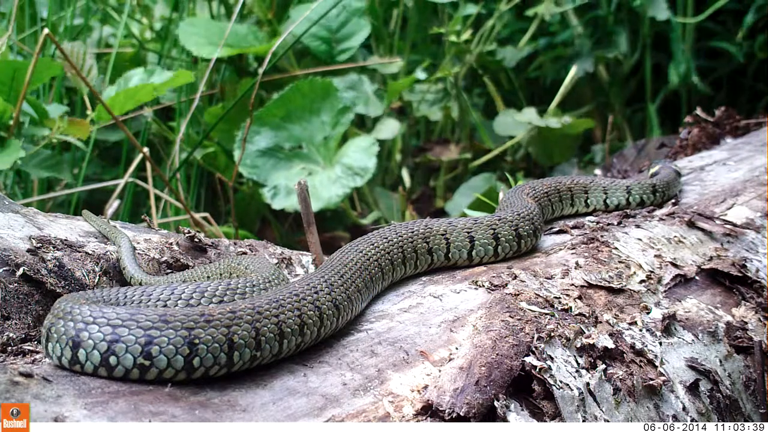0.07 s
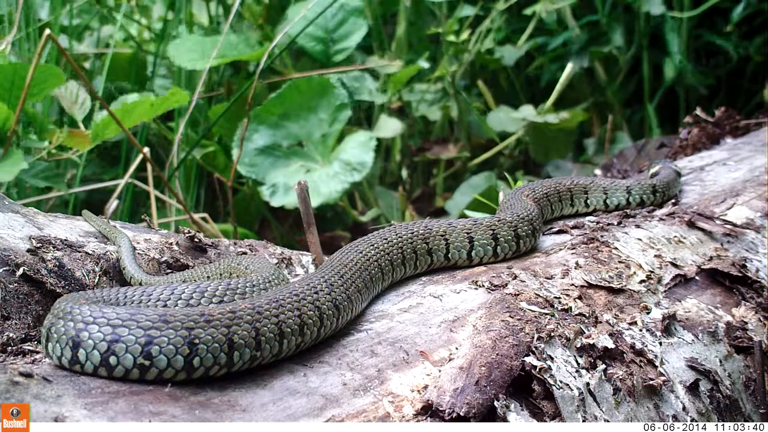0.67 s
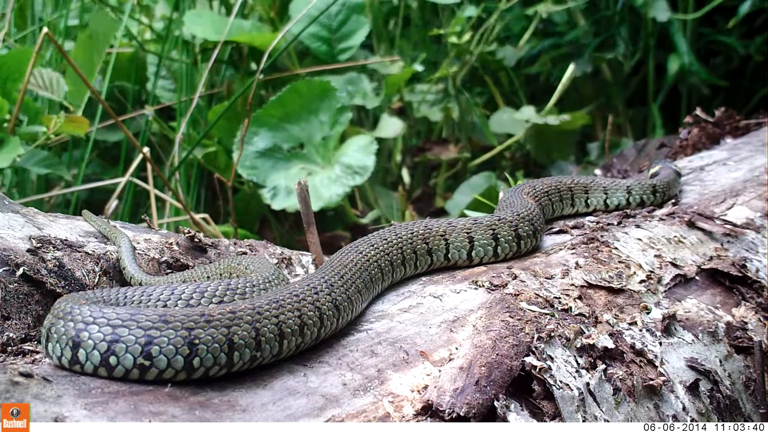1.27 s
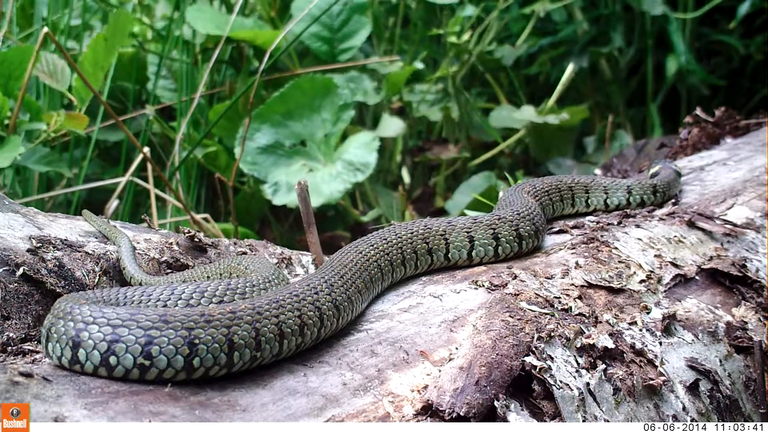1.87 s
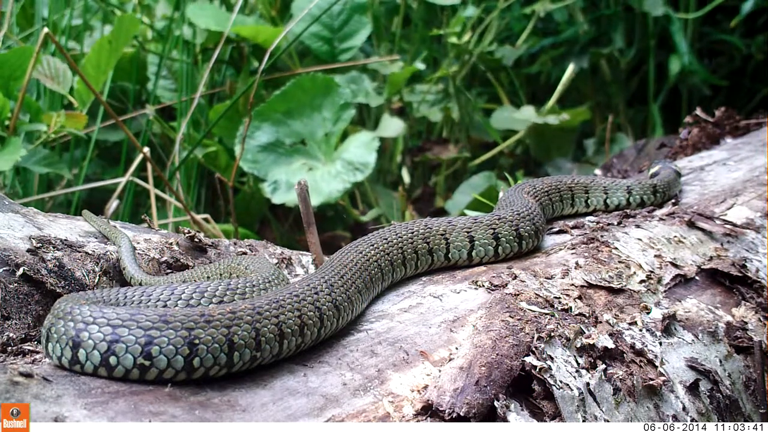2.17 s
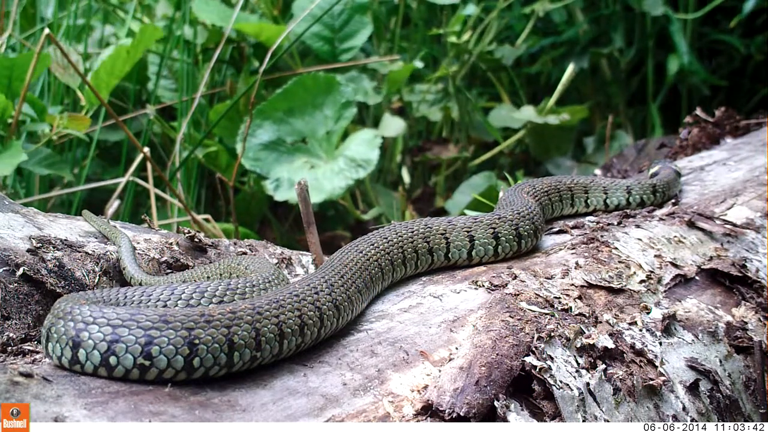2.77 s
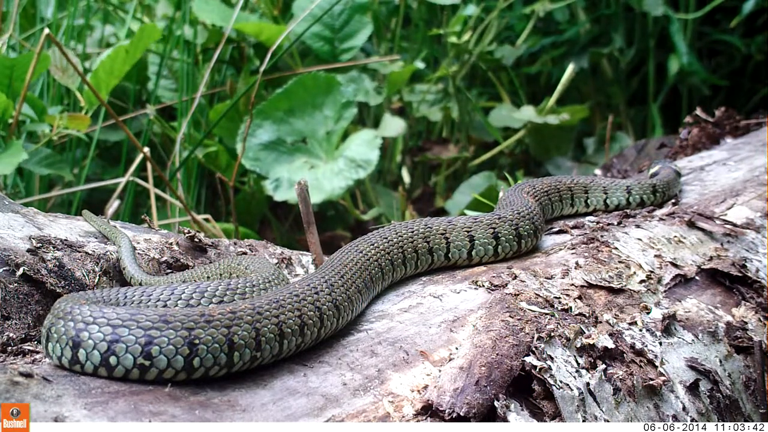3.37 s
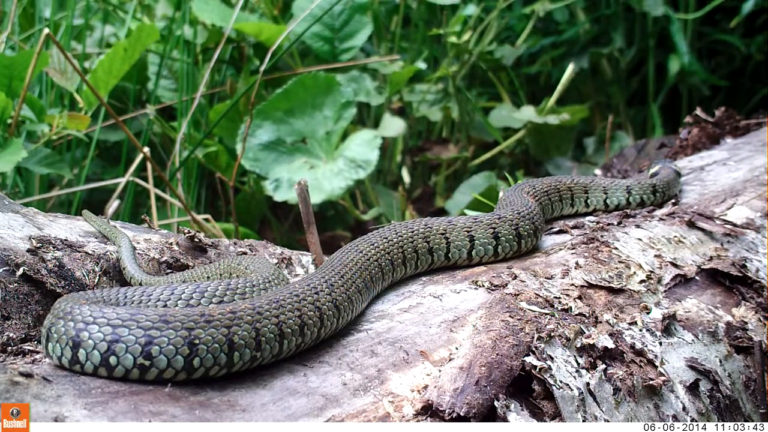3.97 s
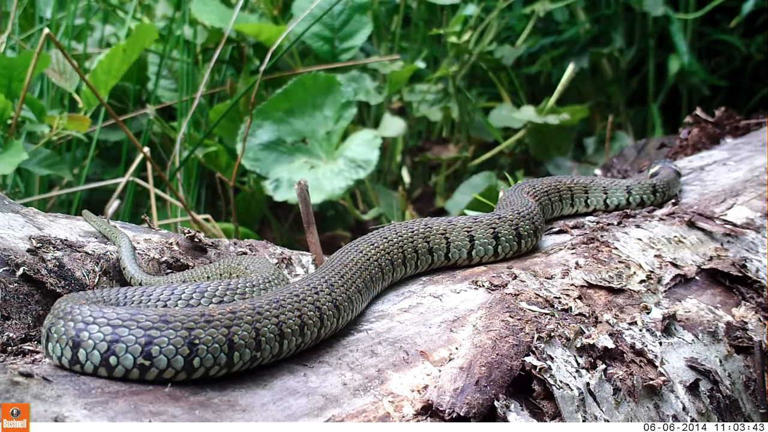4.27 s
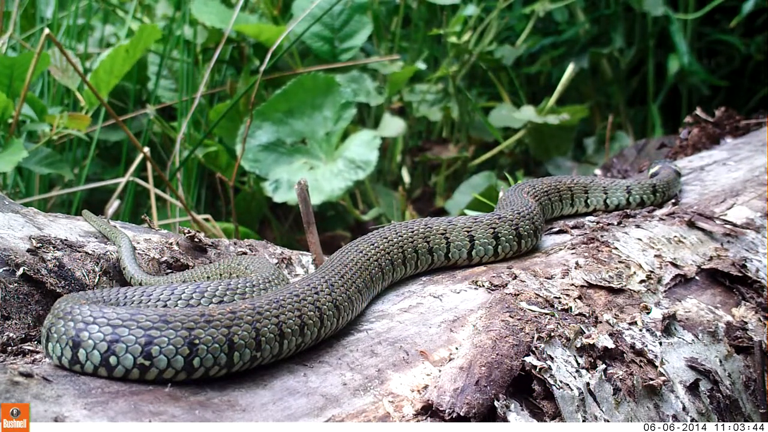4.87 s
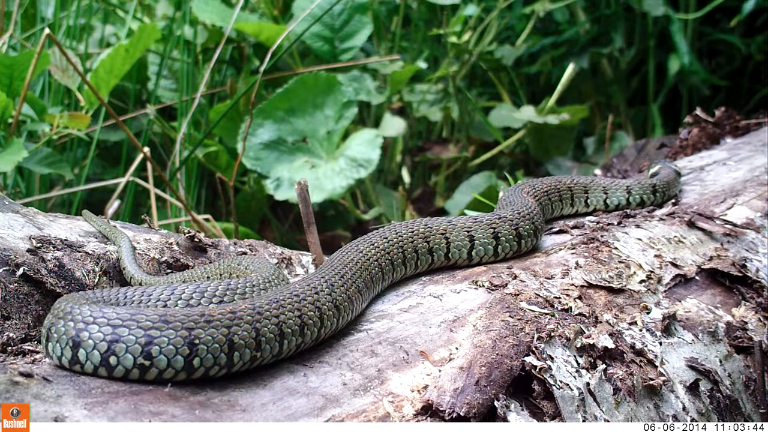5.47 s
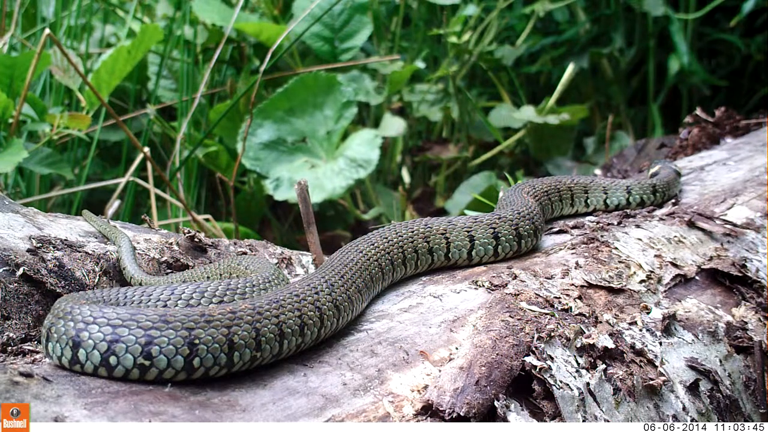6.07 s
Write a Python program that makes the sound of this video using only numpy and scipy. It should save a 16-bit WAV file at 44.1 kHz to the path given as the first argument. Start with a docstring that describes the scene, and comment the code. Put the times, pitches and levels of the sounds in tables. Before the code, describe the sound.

Soft wind buffets the microphone over a low outdoor rumble and leafy hiss, then a small bird warbles and a second flutes faintly.

```python
"""A leafy garden: a low outdoor rumble and the hiss of foliage in the breeze sound throughout.
For the first three seconds, the eddies of short gusts buffet the microphone. Faint chirps come from
far off, and at 1.8 s a small songbird gives a thin high whistle, a nearly pure tone of its syrinx.
From 3.2 s its quick warble and loud hooked notes scatter among the trees.
From 4.1 s a second bird flutes lower down, and returns with a last phrase near the end."""
import sys
import numpy as np
from scipy import signal
from scipy.fft import rfft, irfft
from scipy.io import wavfile
from scipy.ndimage import uniform_filter1d

SR = 44100
rng = np.random.default_rng(int(sys.argv[2]) if len(sys.argv) > 2 else 0)


def put_to_file(sound):
    """Save the sound as 16-bit audio at rate SR, in the file named by the first command-line argument."""
    columns = np.atleast_2d(sound).T  # one column per channel
    safe = np.clip(columns, -1, 1)
    whole_steps = np.round(safe * 32767)
    wavfile.write(sys.argv[1], SR, whole_steps.astype(np.int16))


N = 274743
TIME = np.arange(N) / SR


def undb(db):
    """The decibel scale is logarithmic: 20 dB is a tenfold amplitude."""
    return 10 ** (np.asarray(db) / 20)


def unit(x):
    """Normalisation to an rms of 1."""
    return x / np.sqrt(np.mean(x ** 2))


def walk(rate, size=N):
    """Smooth random modulation with a spread near 1, changing about rate times a second."""
    step = max(int(SR / rate), 1)
    held = np.repeat(rng.standard_normal(size // step + 1), step)
    return 1.52 * uniform_filter1d(held, step)[:size]


def noise(spectrum, size=N):
    """Spectral shaping: white noise is weighted by (frequency_hz, level_db) rows, then set to rms 1."""
    hz, db = np.transpose(spectrum)
    bins = np.maximum(np.fft.rfftfreq(size, 1 / SR), 1)
    gain = undb(np.interp(np.log(bins), np.log(hz), db)) * np.minimum(bins / hz[0], 1)
    return unit(irfft(rfft(rng.standard_normal(size)) * gain, size))


def rumble(level_db):
    """Low-frequency ambient noise from far off, its level drifting slightly."""
    # spectral density of the rumble: frequency_hz, level_db
    spectrum = [(30, -9), (70, 1.5), (105, 2), (160, -2.5), (230, -6.5), (330, -10.5), (500, -16.5),
                (900, -20), (1400, -26.5), (2500, -34), (5000, -43)]
    return noise(spectrum) * undb(level_db + .5 * walk(3.02))


def foliage(flicker_db):
    """Incoherent addition: many leaves merge into a smooth hiss whose level follows the breeze."""
    # spectral density of the leaves: frequency_hz, level_db
    spectrum = [(300, -11.5), (1500, -13), (2900, -11.5), (3500, -8.5), (4050, -2.5), (4450, 0), (5200, -7),
                (6000, -13.5), (6700, -17), (8500, -20.5), (11000, -21.5), (14000, -21.5)]
    # strength of the hiss in the breeze: time_s, level_db
    breeze = [(0, -65), (.8, -64.5), (1.6, -66.5), (2.2, -66), (2.8, -68), (4.4, -67.5), (5.2, -70),
              (6.23, -67.5)]
    breeze_db = np.interp(TIME, *np.transpose(breeze))
    return noise(spectrum) * undb(breeze_db + flicker_db * walk(14))


def eddies(speed, size=N):
    """Turbulent pressure of even strength on the microphone; its frequencies scale with flow speed."""
    # spectral density of the buffeting at speed 1: frequency_hz, level_db
    spectrum = [(6, 2), (16, 0.5), (30, 2.5), (46, -4.5), (60, -2), (78, -12), (110, -18), (160, -30.5),
                (300, -50), (800, -75), (5000, -110)]
    pressure = noise([(hz * speed, db) for hz, db in spectrum], size=size)
    return pressure / np.sqrt(uniform_filter1d(pressure ** 2, int(.055 * SR)))


def wind(draught_db, flutter_db):
    """Amplitude-modulated turbulence: fluttering gusts swell and die away over a steady draught."""
    # gusts on the microphone: peak_s, half_length_s, level_db, speed_ratio
    gusts = [ (0.241, 0.066, -40, 0.69), (0.359, 0.0095, -34, 0.85), (0.452, 0.032, -38.5, 0.93),
             (0.549, 0.042, -35, 0.81), (0.737, 0.084, -35, 0.75), (0.835, 0.045, -31.5, 0.97),
             (0.937, 0.05, -29.5, 1.11), (1.033, 0.19, -41, 0.72), (1.374, 0.075, -34, 0.85),
             (1.468, 0.039, -36, 1.42), (1.574, 0.054, -33.5, 0.57), (1.728, 0.16, -40, 0.69),
             (1.918, 0.013, -32, 0.64), (1.998, 0.054, -39, 0.64), (2.286, 0.026, -44, 0.73),
             (2.355, 0.017, -37, 0.93), (2.471, 0.067, -45, 0.91), (2.891, 0.12, -47, 0.8)]
    buffeting = np.zeros(N)
    for peak, half_length, db, speed in gusts:
        near = np.flatnonzero(abs(TIME - peak) < .5)[:SR]
        swell = np.exp(-((TIME[near] - peak) / half_length) ** 2)
        buffeting[near] += undb(db) * swell * eddies(speed, size=SR)[:len(near)]
    return buffeting * undb(flutter_db * walk(17)) + undb(draught_db) * eddies(speed=0.96)


def trees(direct, near_db, near_t60, echo_db, far_db, far_t60):
    """Scattering by trunks and leaves adds a spray of echoes and a diffuse tail; t60 is in seconds."""
    t = TIME[:SR]
    onset = np.clip((t - .006) / 0.0061, 0, 1)
    reflections = rng.standard_normal(SR) * (rng.random(SR) < 900 / SR)  # about 900 a second
    spray = reflections * onset * np.exp(-np.log(1000) * t / near_t60)
    tail = rng.standard_normal(SR) * onset * np.exp(-np.log(1000) * t / far_t60)
    echo_s, spread_s = 0.0505, 0.0033  # the edge of the wood returns one distinct slap
    slap = rng.standard_normal(SR) * np.exp(-((t - echo_s) / spread_s) ** 2)
    response = undb(near_db) * unit(spray) + undb(echo_db) * unit(slap) + undb(far_db) * unit(tail)
    return direct + signal.fftconvolve(direct, response / np.sqrt(SR))[:N]


def syrinx(notes, trill_hz, waver_hz, flutter_db, edge):
    """A nearly pure tone glides through each note's pitches; fast frequency modulation makes it buzz."""
    out = np.zeros(N + SR)
    for start, length, *pitches, db, depth_hz in notes:
        size = int(length * SR)
        progress = np.linspace(0, 1, size)
        contour = np.polyfit(np.linspace(0, 1, len(pitches)), pitches, len(pitches) - 1)
        trill_cycles = np.cumsum(trill_hz * (1 + 0.31 * walk(150, size))) / SR
        trill = np.sin(2 * np.pi * (trill_cycles + rng.random()))
        hz = np.polyval(contour, progress) + waver_hz * walk(200, size) + depth_hz * trill
        # air pressure builds and falls over the fraction `edge` at each end of the note
        swell = np.sin(np.pi / 2 * np.clip(np.minimum(progress, 1 - progress) / edge, 0, 1))
        envelope = swell * undb(db + flutter_db * walk(77, size))
        at = int(start * SR)
        out[at:at + size] += envelope * np.sin(2 * np.pi * np.cumsum(hz) / SR)
    return out[:N]


def distant_birds():
    """Faint frequency-modulated chirps from deeper in the trees."""
    # chirps: start_s, length_s, start_hz, end_hz, level_db, trill_depth_hz
    chirps = [ (1.61, 0.054, 7650, 7400, -80, 80), (2.02, .08, 3700, 3700, -74, 120),
              (2.14, 0.12, 3750, 3700, -73, 120), (2.32, 0.053, 3800, 3700, -72, 120),
              (2.375, .14, 5600, 4660, -68.5, 132), (4.32, .03, 7430, 7050, -78, 80)]
    return syrinx(chirps, trill_hz=130.8, waver_hz=49, flutter_db=4, edge=0.28)


def fluting_bird():
    """The lower bird's gliding tones sound fluted because they are nearly sinusoidal, with no trill."""
    # fluted notes: start_s, length_s, start_hz, middle_hz, end_hz, level_db
    notes = [ (4.11, 0.081, 1856, 1910, 2050, -75.5), (4.24, 0.115, 1974, 1990, 2110, -73),
             (4.44, 0.11, 2500, 2490, 2480, -77.5), (4.48, 0.17, 3760, 3580, 3520, -74),
             (4.615, 0.103, 2600, 2820, 2840, -77), (5.8, 0.095, 1430, 1640, 1890, -75),
             (5.888, 0.086, 1910, 2090, 2030, -68.5), (6.011, 0.092, 2006, 1960, 1630, -69),
             (6.172, 0.02, 2220, 2280, 2360, -73), (6.206, 0.044, 2450, 2620, 2700, -65)]
    return syrinx([(*note, 0) for note in notes], trill_hz=60, waver_hz=12, flutter_db=2, edge=0.11)


def songbird_warble():
    """The small bird's softer notes; in the twitter, both sides of the syrinx sound (biphonation)."""
    # thin high whistle: start_s, length_s, pitch_hz at five even steps, level_db
    whistle = [(1.8, 0.62, 7620, 8430, 8200, 7560, 7000, -77)]
    # turns, which bend in pitch: start_s, length_s, start_hz, middle_hz, end_hz, level_db
    turns = [(4.493, 0.024, 4340, 5500, 6170, -66), (4.592, 0.058, 4540, 4680, 4300, -61.5),
             (4.62, 0.062, 5800, 6440, 5680, -70.5)]
    # straight slurs, mostly falling: start_s, length_s, start_hz, end_hz, level_db, trill_depth_hz
    slurs = [ (3.468, .045, 5560, 5100, -64, 400), (3.508, 0.041, 5180, 4970, -58, 280),
             (3.823, 0.058, 6390, 6230, -70, 60), (3.873, 0.042, 6300, 6080, -66.5, 130),
             (4.225, 0.063, 5650, 5120, -60, 95), (4.279, 0.024, 5150, 4290, -57.5, 119),
             (4.417, 0.024, 3970, 4130, -61, 220), (4.507, .058, 5930, 5180, -61, 302),
             (4.553, 0.048, 4920, 4460, -66, 110)]
    # short buzzy notes on one pitch: start_s, length_s, pitch_hz, level_db, trill_depth_hz
    twitter = [ (3.16, 0.029, 4930, -63, 420), (3.179, 0.049, 4750, -57.5, 300),
               (3.239, 0.073, 4890, -66, 330), (3.3, 0.036, 4670, -62, 350),
               (3.384, 0.053, 5190, -61.5, 160), (3.914, 0.05, 5420, -66.5, 120),
               (3.947, 0.05, 6200, -70, 200), (3.995, 0.045, 5240, -68, 100),
               (4.018, 0.046, 5480, -61.5, 220), (4.094, 0.042, 5650, -68, 240),
               (4.128, 0.038, 5640, -61.5, 20)]
    turn_depth_hz, upper_hz, upper_db, upper_depth_hz = 131, 6010, -72.5, 388
    notes = [(*note, 0) for note in whistle] + [(*note, turn_depth_hz) for note in turns] + slurs
    notes += [(at, length, hz, hz, db, depth_hz) for at, length, hz, db, depth_hz in twitter]
    notes += [(at, length, upper_hz, upper_hz, upper_db, upper_depth_hz) for at, length, *_ in twitter]
    return syrinx(notes, trill_hz=149.4, waver_hz=29, flutter_db=2, edge=0.28)


def songbird_hooks(rise_hz, trill_depth_hz):
    """The small bird's loud notes are frequency sweeps: an exponential rise to a crest, a late sag."""
    # hooked notes: start_s, length_s, sweep_s, crest_hz, sag_hz, level_db
    hooks = [(3.499, 0.063, 0.004, 4350, 7.4, -50), (3.741, .05, 0.014, 4570, 150, -57),
             (4.373, .045, 0.0097, 4540, 590, -54)]
    progress = np.linspace(0, 1, 9)
    notes = []
    for at, length, sweep_s, crest_hz, sag_hz, db in hooks:
        pitches = crest_hz - rise_hz * np.exp(-progress * length / sweep_s) - sag_hz * progress ** 2.5
        notes.append((at, length, *pitches, db, trill_depth_hz))
    return syrinx(notes, trill_hz=151, waver_hz=13, flutter_db=1.7, edge=0.22)


def scene():
    """Superposition of air and birds; the farthest birds have the most reverberant sound."""
    air = rumble(level_db=-57.5) + foliage(flicker_db=0.67) + wind(draught_db=-51.5, flutter_db=1)
    warble = songbird_warble()
    hooks = songbird_hooks(rise_hz=1158, trill_depth_hz=31)
    flute = fluting_bird()
    chirps = distant_birds()
    birds = trees(warble, near_db=-5.5, near_t60=0.21, echo_db=-15, far_db=-5.5, far_t60=0.57)
    birds += trees(hooks, near_db=-7, near_t60=0.12, echo_db=-15, far_db=-14, far_t60=0.41)
    birds += trees(flute, near_db=-15, near_t60=0.15, echo_db=-21, far_db=-21, far_t60=0.9)
    birds += trees(chirps, near_db=-4.5, near_t60=0.2, echo_db=-15, far_db=-4, far_t60=0.7)
    return (air + birds)[None]


def record(dry):
    """The microphone's self-noise adds a faint hiss; a steep low-pass filter limits the bandwidth."""
    # spectral density of the self-noise: frequency_hz, level_db
    spectrum = [(1000, 5), (8000, 6), (11000, -5.5), (13000, 6), (14000, -0.5)]
    hiss = undb(-77) * noise(spectrum)
    lowpass = signal.ellip(12, .1, 70, 13900, fs=SR, output="sos")
    return signal.sosfilt(lowpass, dry + hiss)


dry = scene()
out = record(dry)
put_to_file(out)
```